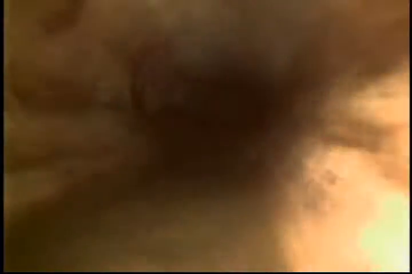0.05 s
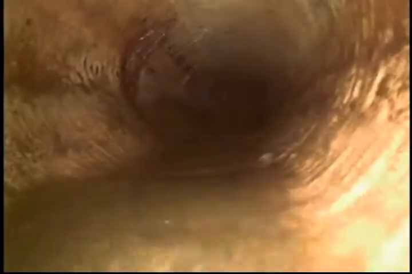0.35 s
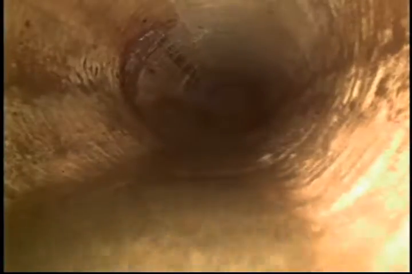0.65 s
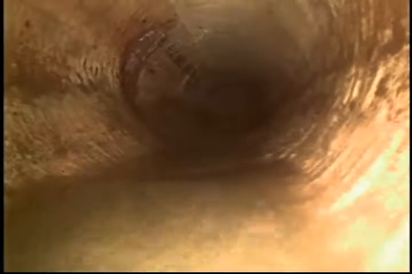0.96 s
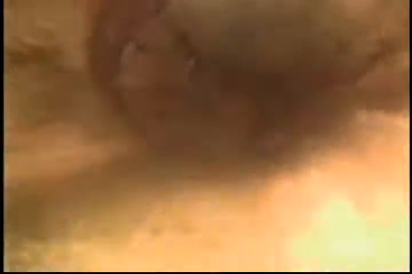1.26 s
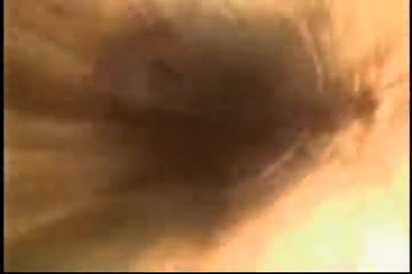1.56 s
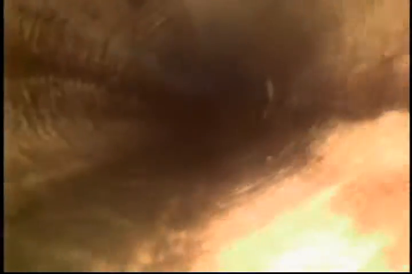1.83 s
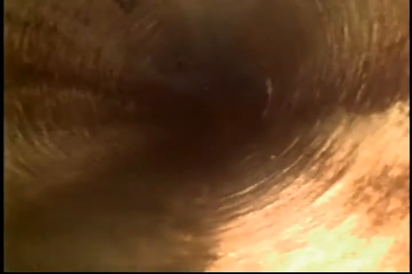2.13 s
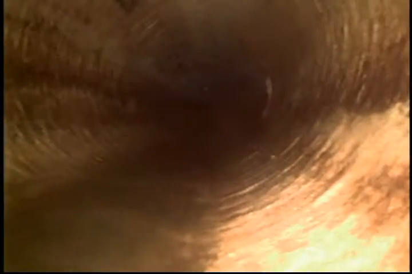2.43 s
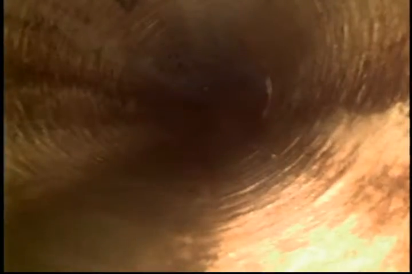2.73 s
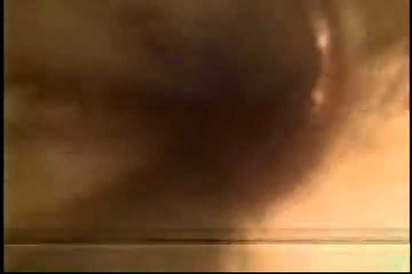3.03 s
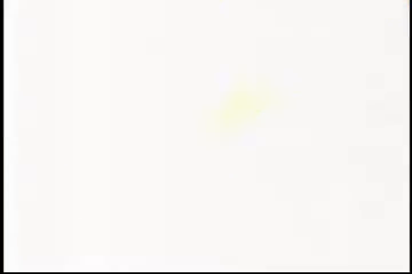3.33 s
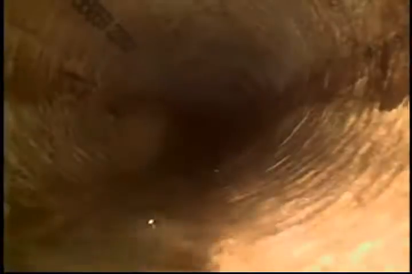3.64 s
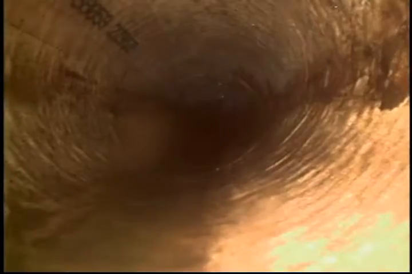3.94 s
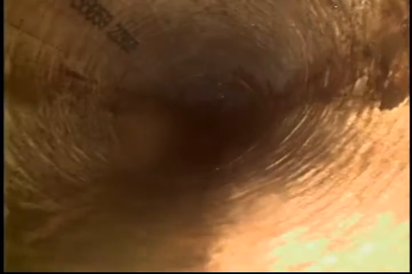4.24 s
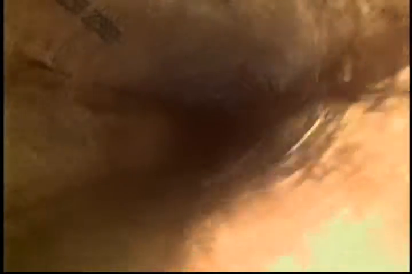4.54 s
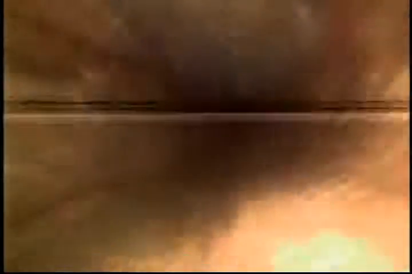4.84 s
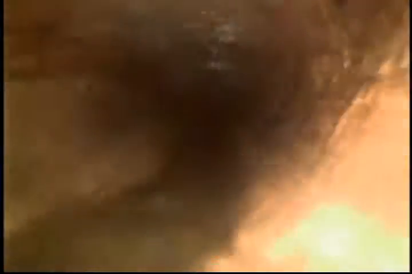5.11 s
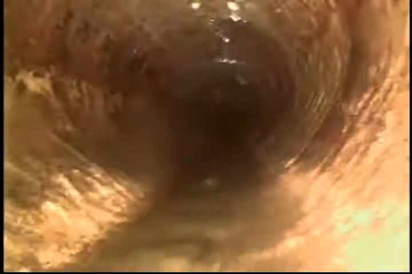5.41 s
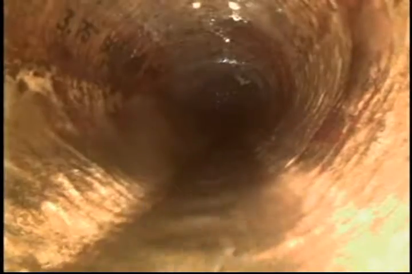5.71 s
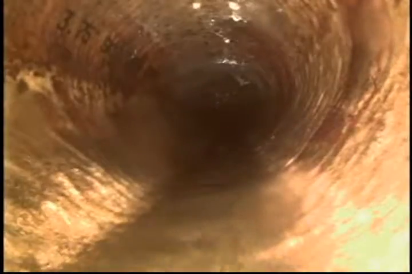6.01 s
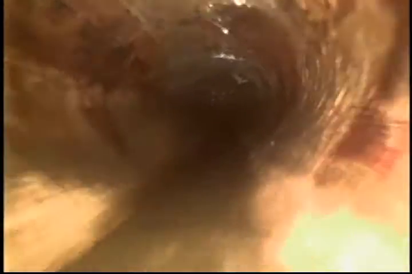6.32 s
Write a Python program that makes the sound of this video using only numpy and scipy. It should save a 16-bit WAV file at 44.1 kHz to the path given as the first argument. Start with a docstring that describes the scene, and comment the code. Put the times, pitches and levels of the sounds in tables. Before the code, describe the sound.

Sharp, hollow knocks and rough grinding inside a pipe, with bursts of hiss as a rod pushes a camera along.

```python
"""An inspection camera's head knocks and scrapes along the inside of a pipe.
Each knock cracks, then the pipe rings hollow; the hardest ones overload the microphone.
Between knocks the head grinds over the wall and sets the pipe droning.
The rod that pushes the camera hisses with each stroke, over faint background noise."""
import sys
import numpy as np
from scipy import signal
from scipy.fft import rfft, irfft, next_fast_len
from scipy.io import wavfile
from scipy.ndimage import uniform_filter1d

SR = 44100
rng = np.random.default_rng(int(sys.argv[2]) if len(sys.argv) > 2 else 0)


def log_audio(samples):
    """Write samples as a 16-bit WAV file to the path given in sys.argv[1]."""
    # one column per channel
    frames = np.atleast_2d(samples).T
    # limit to full scale, then quantise
    limited = np.clip(frames, -1, 1)
    pcm = np.round(limited * 32767).astype(np.int16)
    wavfile.write(sys.argv[1], SR, pcm)


N = 280917
TIME = np.arange(N) / SR


def amp(db):
    """Turns decibels into a gain."""
    return 10 ** (np.asarray(db) / 20)


def unit(x):
    """Scales a sound to an average strength (rms) of 1."""
    return x / np.sqrt(np.mean(x ** 2) + 1e-20)


def read(points, hz):
    """Looks up a value between a table's frequencies, on a log scale."""
    f, value = np.transpose(points)
    return np.interp(np.log(hz + 1), np.log(f), value)


def follow(curve):
    """Joins (time, value) points with straight lines."""
    return np.interp(TIME, *np.transpose(curve))


def add(mix, start, sound):
    """Mixes a sound in at a start time in seconds."""
    part = mix[max(round(start * SR), 0):][:len(sound)]
    part += sound[:len(part)]


def filtered(x, spectrum):
    """Turns each frequency up or down as a table says."""
    size = next_fast_len(len(x))
    hz = np.fft.rfftfreq(size, 1 / SR)
    return irfft(rfft(x, size) * amp(read(spectrum, hz)), size)[:len(x)]


def colour(x, spectrum):
    """Filters a sound, then sets its strength to 1."""
    return unit(filtered(x, spectrum))


def resonate(x, hz, width_hz):
    """Rings at a moving pitch: shifts that pitch down to zero, smooths twice and shifts back."""
    turn = np.exp(2j * np.pi * np.cumsum(hz) / SR)
    keep = np.exp(-np.pi * width_hz / SR)
    return unit((turn * signal.lfilter([1], [1, -2 * keep, keep * keep], x / turn)).real)


def swell(start, length, rise, fall):
    """A smooth rise, a hold and a smooth fall."""
    up = np.clip((TIME - start) / rise, 0, 1)
    down = np.clip((start + length - TIME) / fall, 0, 1)
    return up * up * (3 - 2 * up) * down * down * (3 - 2 * down)


def friction(per_s, spread_db, rush):
    """Sliding makes tiny slips of uneven size over a smooth rush."""
    size = amp(spread_db * np.minimum(rng.exponential(1, N), 4))
    slips = size * rng.choice([-1, 1], N) * (rng.random(N) < per_s / SR)
    return unit(unit(slips) + rush * rng.standard_normal(N))


def wander(x, depth_db, bins, frames):
    """Narrow tones come and go as the touching point travels; each is bins wide and frames long."""
    slices = signal.stft(x, SR, nperseg=1024, noverlap=768)[2]
    patches = uniform_filter1d(rng.standard_normal(slices.shape), bins, axis=0)
    patches = unit(uniform_filter1d(patches, frames, axis=1))
    return unit(signal.istft(slices * amp(depth_db * patches), SR, nperseg=1024, noverlap=768)[1][:N])


# Tone of the background noise: f/Hz, level/dB (levels in all tables are relative)
BACKGROUND_TONE = [(20, -1), (60, 18), (300, -19), (1000, -16), (4000, -25), (10000, -24), (16000, -53)]
def background(level_db=-59):
    """Each channel has its own faint, low noise."""
    return amp(level_db) * np.array([colour(rng.standard_normal(N), BACKGROUND_TONE) for _ in range(2)])


# How much left and right differ, against what they share: f/Hz, level/dB
STEREO_WIDTH = [(60, -32), (500, -37.5), (1000, -39.5), (2000, -38.5), (4000, -27.5), (8000, -28.5),
                (16000, -25.5)]
def stereo(sound):
    """Left and right are nearly alike; the treble is a trace wider."""
    phase_shifted = signal.hilbert(sound, next_fast_len(N))[:N].imag
    side = filtered(phase_shifted, STEREO_WIDTH)
    return np.array([sound + side, sound - side])


# The rod when it hardly moves: hiss/dB, ring/dB, rubbing/dB
ROD_IDLE = [-62.5, -59.5, -48.5]
# Pushes: t/s, length/s, rise/s, hiss/dB, change on the way/dB, ring over hiss/dB, rubbing over hiss/dB
ROD_PUSHES = [(-.08, 0.2, .06, -28.5, -5, -2.5, -1.5), (0.223, 0.33, 0.2, -29.5, -7.5, 0.5, -2.5),
              (0.467, 0.32, 0.18, -28, -5.5, 0.5, -3.5), (1.511, 0.4, 0.089, -26, -17, 2.5, -0.5),
              (1.991, 0.38, .1, -34, -1, 2.5, -1), (2.31, 0.29, 0.084, -33, 1.5, -1, -3),
              (3.156, .35, 0.17, -24, -14, 2, 0), (3.59, 0.63, 0.18, -33, -8, 0, 4),
              (3.987, 0.26, 0.083, -28.5, -6.5, 2, -1.5), (4.839, 0.27, 0.15, -28.5, -1.5, 1.5, -2.5),
              (5.134, 0.12, 0.075, -39.5, 7, -8, -6.5), (5.348, 0.72, 0.052, -33, -9, 2, -7.5),
              (5.724, .29, 0.16, -22.5, -13, -6, -5)]
# The rod creeps on between pushes, gathering speed: t/s, length/s, hiss it heads for/dB
ROD_CREEPS = [(0.043, 0.27, -54.5), (1.09, 0.52, -47.5), (1.82, 0.28, -54.5), (2.794, 0.45, -46),
              (4.363, 0.64, -45.5), (5.032, 0.17, -49.5), (5.26, 0.28, -47), (6.01, 0.43, -60)]
def rod_motion(stop_s=0.08, ring_build_db=2, creep_rise_s=0.061, creep_db_per_s=30):
    """How strong the hiss, ring and rubbing are as the rod moves; pushes and creeps add in power."""
    power = amp(ROD_IDLE)[:, None] ** 2 * np.ones(N)
    for start, length, rise, db, change_db, ring_db, rub_db in ROD_PUSHES:
        progress = np.clip((TIME - start) / length, 0, 1)
        hiss = swell(start, length, rise, stop_s) * amp(db + change_db * progress)
        ring = hiss * amp(ring_db + ring_build_db * (progress - 1))
        power += np.square([hiss, ring, hiss * amp(rub_db)])
    for start, length, db in ROD_CREEPS:
        growth = amp(db + creep_db_per_s * (TIME - start - length))
        hiss = swell(start, length, creep_rise_s, stop_s) * growth
        power += np.outer(amp([0, 1.5, 14]), hiss) ** 2  # slow sliding is duller: mostly rubbing
    return np.sqrt(power)


def rod_pitch(push, slack_hz=4710, sink_hz=554, lag_s=0.034):
    """The rod bends under a push, and its main pitch sinks a moment later."""
    keep = np.exp(-1 / (lag_s * SR))
    bend = signal.lfilter([1 - keep], [1, -keep], push)
    return slack_hz - sink_hz * bend / bend.max()


# Where the rod rings: multiple of its main pitch, width/Hz, level/dB
ROD_RINGS = [(0.692, 330, -6.5), (0.998, 510, 8), (1.36, 714, -8)]
# Tone of the rod's hiss: f/Hz, level/dB
HISS_TONE = [(1500, -21), (3600, 5.5), (5000, 6), (6500, 4.5), (8500, 1), (10800, -0.5), (11600, 1),
             (13000, -1), (14500, 2), (15500, 9), (16000, -5)]
def sliding_rod(hiss_level, ring_level, hiss_db=4, ring_db=-2):
    """Fine, fast friction hisses and makes the rod ring in broad bands."""
    pitch = rod_pitch(hiss_level)
    slips = wander(friction(per_s=3000, spread_db=2, rush=0.9), depth_db=3.3, bins=3, frames=14)
    ring = sum(amp(db) * resonate(slips, pitch * multiple, width) for multiple, width, db in ROD_RINGS)
    hiss = wander(friction(per_s=3000, spread_db=2, rush=0.9), depth_db=2.4, bins=3, frames=12)
    # a close echo, three vibrations late, adds ripples to the tone that glide with the pitch
    echo = 0.22 * np.interp(TIME - 3 / pitch, TIME, hiss)
    hiss = colour(hiss + echo, HISS_TONE)
    return amp(hiss_db) * hiss_level * hiss + amp(ring_db) * ring_level * unit(ring)


# Tone of the head's rubbing: f/Hz, level/dB
RUB_TONE = [(600, -4), (1500, -10), (2000, 0), (2500, -1), (3100, 1.5), (3650, -5), (4600, -1),
            (6500, -7.5), (9000, -15), (16000, -38)]
def rubbing_head(level, gain_db=-1):
    """The camera head rubs along the wall in fine slips."""
    slips = wander(friction(per_s=1800, spread_db=2, rush=1), depth_db=2.8, bins=3, frames=10)
    return amp(gain_db) * level * colour(slips, RUB_TONE)


# The pipe's own notes: f/Hz, level/dB, time to fade by 60 dB/s
PIPE_NOTES = [(81.6, -23.5, 0.17), (113.5, -23.5, 0.12), (192, 2, 0.089), (317.5, 1.5, 0.18),
              (352.4, -6, 0.096), (520, -3.5, 0.13), (584.5, -3.5, 0.092), (603.8, -2.5, 0.11),
              (668, -4.5, 0.097), (763, -9.5, 0.041), (835.7, -4.5, 0.086), (1048, -16, 0.1),
              (1298, -1, 0.07), (1362.5, -6, 0.11), (1865, -4, 0.12), (2050, -12, 0.13), (3250, 2.5, 0.049),
              (4600, -37, 0.17)]
def pipe_ring(t, gain_db):
    """The pipe's notes start from rest, neighbours swinging opposite ways, and die away."""
    hz, db, fade_s = np.transpose(PIPE_NOTES)[:, :, None]
    sign = (-1) ** np.arange(len(PIPE_NOTES))[:, None]
    return (sign * amp(db + gain_db - 60 * t / fade_s) * np.sin(2 * np.pi * hz * t)).sum(0)


# Sound level from the head's weight on the wall: t/s, level/dB
HEAD_CONTACT = [(0.0, -37.5), (0.28, -47.5), (0.39, -33), (0.57, -44), (0.92, -41), (1.1, -46.5),
                (1.29, -43.5), (1.51, -38), (1.92, -42.5), (2.07, -34.5), (2.15, -35.5), (2.94, -43),
                (3.14, -41.5), (3.78, -33.5), (3.95, -44.5), (4.22, -32.5), (4.36, -39.5), (4.61, -40.5),
                (4.77, -42), (5.09, -39.5), (5.27, -40.5), (5.5, -36.5), (5.73, -35.5), (5.91, -45.5),
                (6.37, -42.5)]
# Scrapes: t/s, length/s, grinding/dB, drone/dB, hollow note f/Hz, note over grinding/dB
HEAD_SCRAPES = [(0.196, 0.17, -42, -34, 726, -14), (0.363, 0.26, -38.5, -34, 800, -12),
                (0.758, 0.35, -46, -35, 910, -2.5), (1.876, 0.12, -34.5, -41, 560, -18),
                (2.024, .13, -34, -29, 764, -2), (2.086, 0.16, -26, -23, 737, -5.5),
                (2.51, 0.2, -36, -41, 770, -4), (3.296, 0.19, -32, -32.5, 804, -4),
                (3.494, 0.14, -39.5, -55, 754, 1), (3.636, 0.11, -26.5, -45, 780, -2),
                (3.763, 0.29, -31.5, -33.5, 900, -20), (4.16, 0.18, -40, -36.5, 880, -5),
                (4.723, 0.2, -29, -25.5, 594, -15), (5.338, 0.16, -25, -28.5, 820, -21),
                (5.556, 0.3, -62, -38, 517, -20), (5.797, .11, -29.5, -30, 930, -3.5),
                (6.028, 0.14, -36.5, -34.5, 685, -17)]
def head_motion(catch_s=0.026, let_go_s=0.058):
    """The head slides and sometimes catches: gives three strengths and the hollow note's pitch."""
    power = np.outer(amp([2, -3, -24]), amp(follow(HEAD_CONTACT))) ** 2  # drone, grinding, note
    for start, length, grind_db, drone_db, _, note_db in HEAD_SCRAPES:
        scrape = swell(start, length, catch_s, let_go_s)
        power += np.outer(amp([drone_db, grind_db, grind_db + note_db]), scrape) ** 2
    note_hz = follow([(start + length / 2, hz) for start, length, _, _, hz, _ in HEAD_SCRAPES])
    return np.sqrt(power), note_hz


# Tones of the pipe's drone and the head's grinding: f/Hz, level/dB
DRONE_TONE = [(20, -63), (60, -55), (95, 5), (160, -7), (250, 12.5), (330, -3), (450, -7), (900, -38),
              (3000, -35)]
GRIND_TONE = [(150, -26), (400, -8), (560, -0.5), (850, 3), (1100, -6.5), (1350, -2.5), (1700, -9),
              (3500, -12.5), (9000, -48)]
def grinding_head(drone_db=-5, grind_db=-2):
    """Coarse slips of the head ring the pipe: a low drone, grinding and a hollow note."""
    (drone_level, grind_level, note_level), note_hz = head_motion()
    slips = friction(per_s=450, spread_db=1.8, rush=0.45)
    ringing = unit(signal.oaconvolve(slips, pipe_ring(TIME[:SR // 2], 0))[:N])
    drone = colour(wander(ringing + 4.05 * slips, depth_db=2.5, bins=2, frames=10), DRONE_TONE)
    grind = colour(wander(ringing + 4 * slips, depth_db=2.5, bins=3, frames=14), GRIND_TONE)
    note = note_level * resonate(slips, note_hz, width_hz=140)
    return amp(drone_db) * drone_level * drone + amp(grind_db) * (grind_level * grind + note)


def spot_boost(hz, note_hz, boost_db=5, octaves=0.17):
    """A struck spot rings most near its own note: the extra level in dB."""
    return boost_db * np.exp(-(np.log2((hz + 1) / note_hz) / octaves) ** 2)


# Tone of the wall's clatter: f/Hz, level/dB
CLATTER_TONE = [(40, -49), (75, -17.5), (150, -4.5), (400, -4), (600, 0.5), (900, 0.5), (1150, -6.5),
                (1900, -5), (3100, -6), (3650, -11.5), (4700, -7.5), (5600, -20.5), (8000, -24),
                (16000, -52)]
# How long the wall rings: f/Hz, time to fade by 60 dB/s
CLATTER_FADE = [(100, 0.81), (400, 0.25), (1000, 0.23), (3000, 0.21), (6000, 0.16), (14000, 0.22)]
def wall_clatter(t, note_hz, bright_db, uneven_db=4):
    """The wall rings with countless close, uneven tones; the low ones last longest."""
    noise = colour(rng.standard_normal(len(t)), CLATTER_TONE)
    hz, age, slices = signal.stft(noise, SR, nperseg=512)
    hz = hz[:, None]
    tilt_db = bright_db * np.log2(np.clip(hz, 400, 12000) / 1200)
    spot_db = spot_boost(hz, note_hz) + tilt_db + uneven_db * rng.uniform(-0.83, 1, hz.shape)
    fade_db = 60 * age / read(CLATTER_FADE, hz)
    return signal.istft(slices * amp(spot_db - fade_db), SR, nperseg=512)[1][:len(t)]


# Knocks: t/s, level/dB, spot's note f/Hz, thud/dB, thud f/Hz, brightness/(dB per octave)
HEAD_KNOCKS = [(0.2, -24, 735, -18, 200, 3.5), (0.253, -18.5, 353, -15, 190, 2),
               (0.39, -13, 447, -18, 320, -2.5), (1.386, -20, 600, -13.5, 190, 1.5),
               (1.627, -18, 580, -27, 320, -6), (1.879, -9, 567, -20, 320, 2.5),
               (1.918, -14.5, 560, -16.5, 320, -1), (1.966, -20, 980, -15, 190, 2.5),
               (2.209, -6.5, 904, -18, 190, 7), (2.215, 9.5, 1060, -17.5, 197, 0),
               (2.55, -22, 793, -37, 312, -6.5), (2.65, -21, 810, -11.5, 320, -5.5),
               (2.753, -20.5, 353, -21, 320, -2.5), (3.108, -18, 1020, -24, 320, 0),
               (3.558, -7, 740, -23.5, 320, 2.5), (3.623, -16, 670, -27, 320, -2),
               (3.738, -6, 840, -21, 322, -0.5), (3.755, -9, 860, -13, 190, -0.5),
               (4.302, -15.5, 850, -20, 320, -5), (4.555, 4, 650, -21.5, 110, -0.4),
               (4.749, -11.5, 719, -22, 190, 2), (4.763, 5.5, 547, -16, 75, -0.5),
               (4.939, -15.5, 650, -39, 190, 1), (5.254, -23.5, 660, -17, 320, 1),
               (5.303, -18.5, 750, -18, 320, 1.5), (5.391, -3.5, 825, -31, 320, -4.5),
               (5.399, 6, 493, -16.5, 360, 1.8), (5.834, -19.5, 842, -11.5, 281, -6.5),
               (6.073, -15, 720, -25, 320, 6), (6.34, -20, 935, -16, 110, -0.5)]
def knocking_head(ring_db=-16, clatter_db=-19, touch_s=0.0002, crack_s=0.006, build_s=0.005):
    """The head hits the wall with a crack; the pipe's ring and low thud build just after."""
    t, out = TIME[:SR // 2], np.zeros(N)
    pipe_hz = np.array(PIPE_NOTES)[:, :1]
    crack = 1 + 1.98 * np.exp(-t / crack_s)
    build = 1 - np.exp(-t / build_s)
    for start, db, note_hz, thud_db, thud_hz, bright_db in HEAD_KNOCKS:
        landing = 1 - np.exp(-t / touch_s * amp(0.083 * db))  # a light blow lands more slowly
        clatter = amp(clatter_db) * landing * crack * wall_clatter(t, note_hz, bright_db)
        low_db = thud_db + spot_boost(pipe_hz, thud_hz, boost_db=6, octaves=0.99)
        # a harder blow moves the whole pipe, so the ring gains a little on the clatter
        high_db = ring_db + 0.01 * db + spot_boost(pipe_hz, note_hz)
        ring = build * pipe_ring(t, np.where(pipe_hz < 400, low_db, high_db))
        add(out, start, amp(db) * (clatter + ring))
    # the microphone passes almost nothing of the knocks below 75 Hz
    return signal.sosfilt(signal.butter(4, 75, "highpass", fs=SR, output="sos"), out)


def scene():
    """Mixes the rod and the camera head over the background."""
    hiss_level, ring_level, rub_level = rod_motion()
    sliding = sliding_rod(hiss_level, ring_level) + grinding_head() + rubbing_head(rub_level)
    return stereo(sliding + knocking_head()) + background()


def record(dry, offset=0.015, ceiling=0.98, top_hz=15850):
    """The input sits slightly off zero and clips on the hardest knocks; the highest treble is cut."""
    clipped = np.clip(dry + offset, -ceiling, ceiling)
    treble_cut = signal.firwin(511, top_hz, window=("kaiser", 7), fs=SR)
    return signal.oaconvolve(clipped, treble_cut[None], "same", axes=1)


dry = scene()
out = record(dry)
log_audio(out)
```